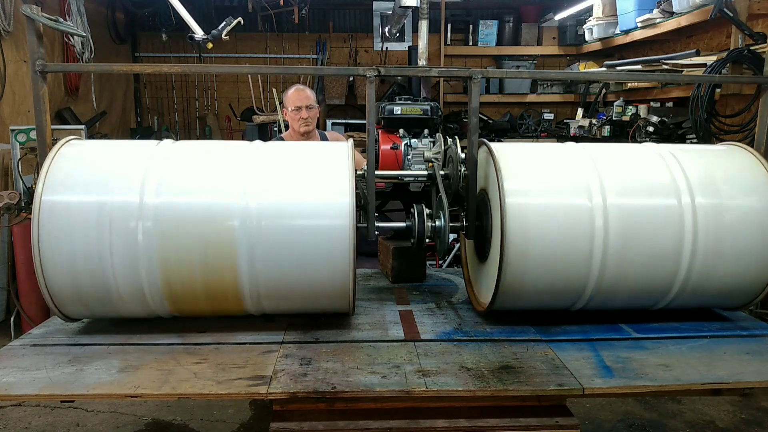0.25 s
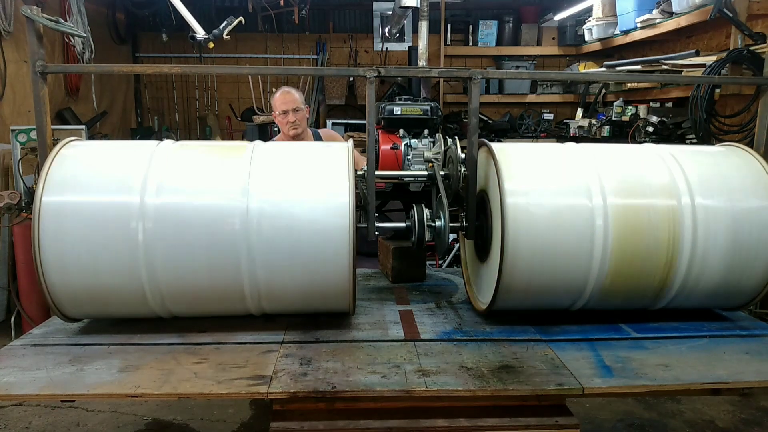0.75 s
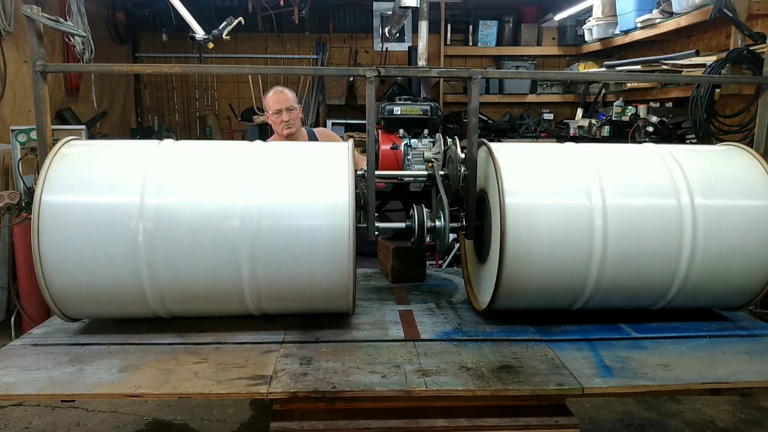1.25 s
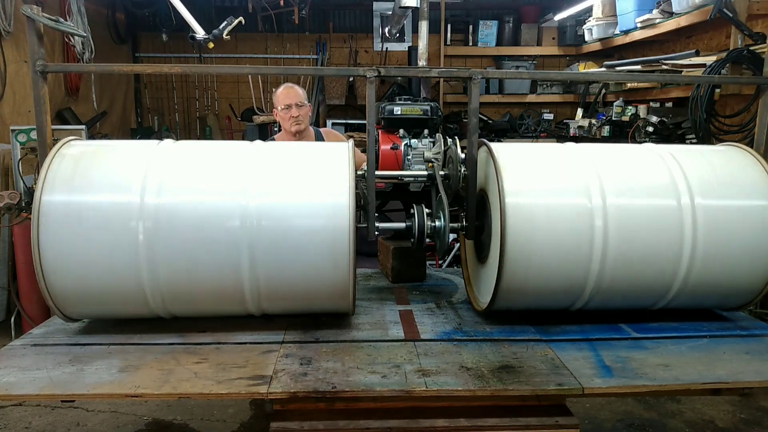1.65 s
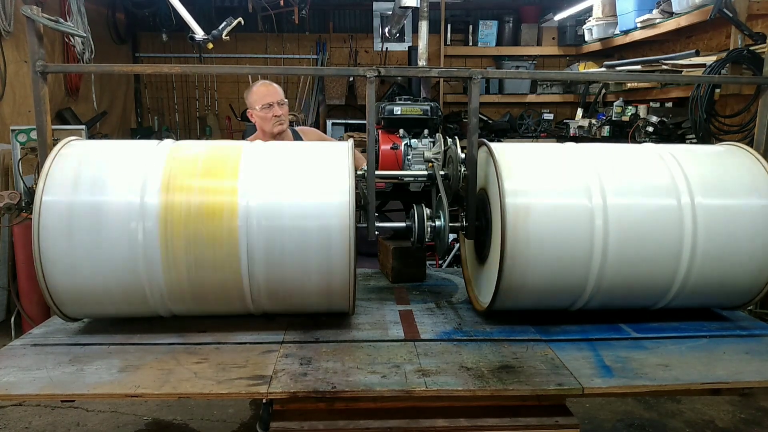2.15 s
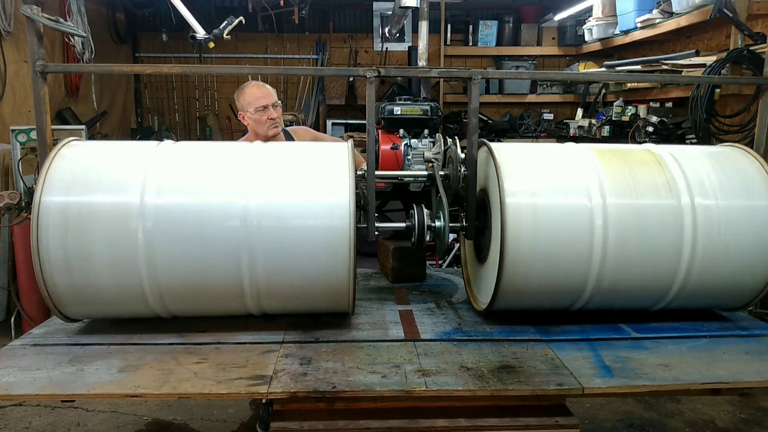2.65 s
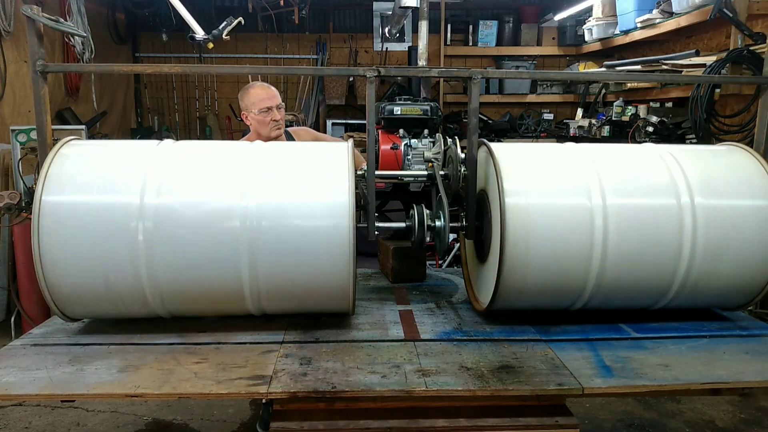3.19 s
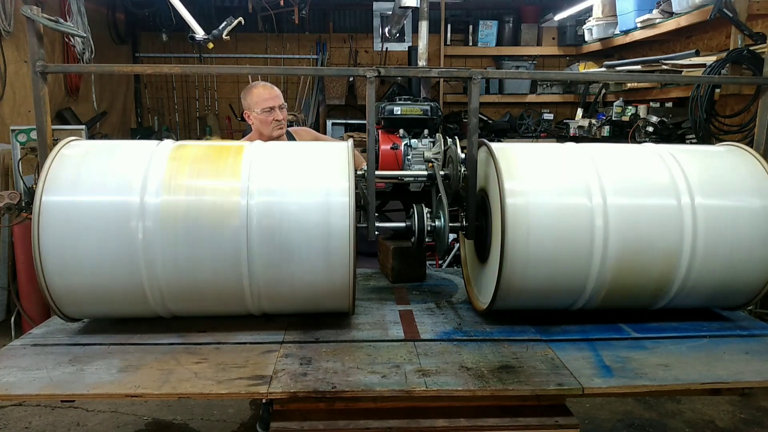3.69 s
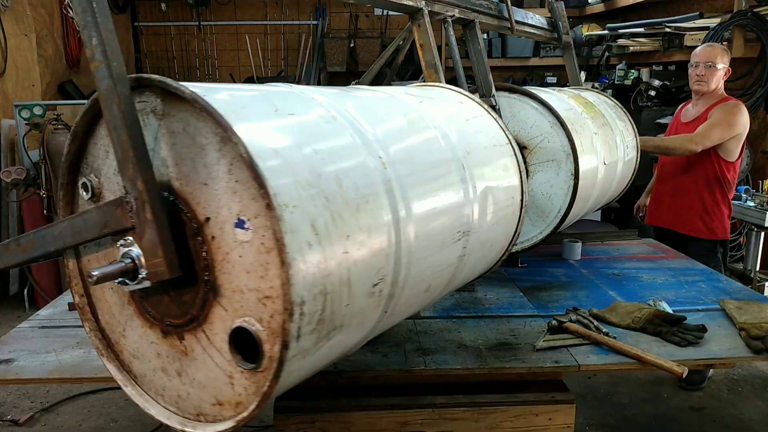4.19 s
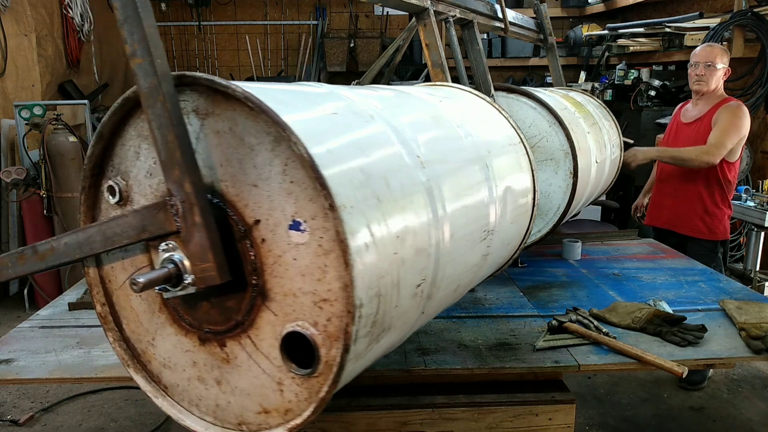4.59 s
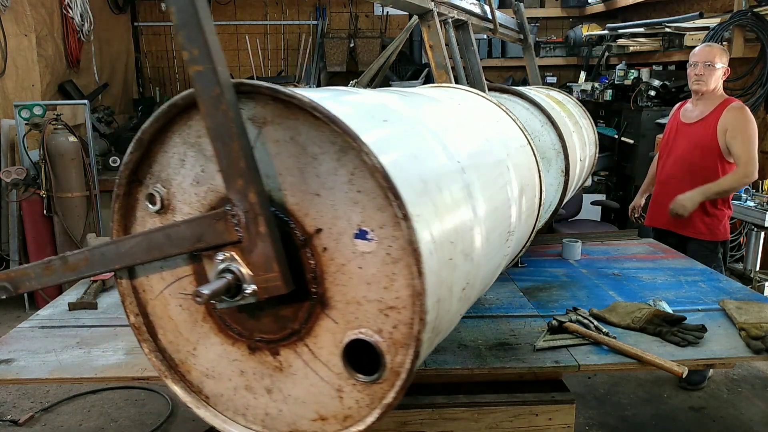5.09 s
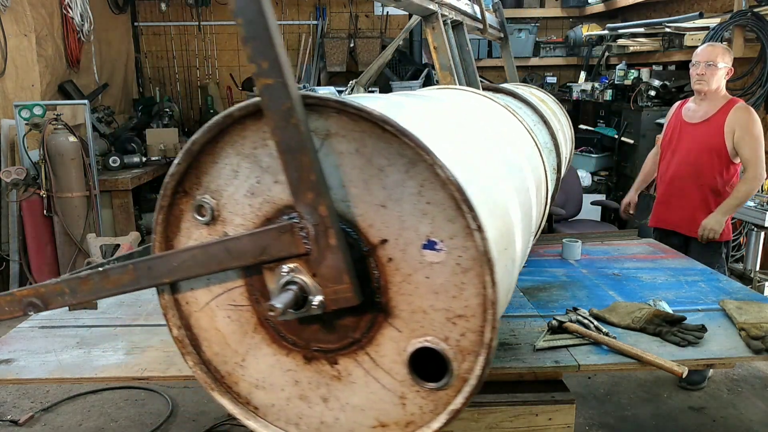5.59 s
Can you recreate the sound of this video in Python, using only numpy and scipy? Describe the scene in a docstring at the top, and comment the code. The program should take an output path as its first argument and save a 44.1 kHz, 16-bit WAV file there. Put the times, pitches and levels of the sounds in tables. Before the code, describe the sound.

A dense mechanical roar starts at once: rapid engine firing, uneven gearing pulsing about five times a second, hollow steel drums ringing under constant small contacts, and harsh rushing air. Short rasps pass early and near the end of the run. A sudden edit replaces everything with a far quieter indoor shop, its faint hum and hollow air broken by soft dull movements and a low soft bump. Single-channel, overloaded microphone sound.

```python
"""Petrol engine turning steel drums

A small single-cylinder petrol engine on a workbench turns two empty steel drums: a harmonic series of the
firing rate drones through the shop, and gearing throbs and growls in a pattern repeated five times a second.
Shaped noise gives the rush, random contacts ring steel modes, and two bursts of tiny slips scrape.
After a hard cut the quiet shop fades in: coloured noise, soft shuffles, a faint hum, a rumble and a low bump."""
import sys
import numpy as np
from scipy import signal
from scipy.fft import rfft, irfft, next_fast_len
from scipy.io import wavfile

SR = 44100
rng = np.random.default_rng(int(sys.argv[2]) if len(sys.argv) > 2 else 0)


def unload_wav(signal):
    """Save mono or channel-first audio to the path in sys.argv[1] as 16-bit WAV at rate SR, clipped to [-1, 1]."""
    wavfile.write(
        sys.argv[1],
        SR,
        np.round(np.clip(np.atleast_2d(signal).T, -1, 1) * 32767).astype(np.int16),
    )


N = 257544
TIME = np.arange(N) / SR
CUT_S, RESUME_S = 4.1727, 4.185  # the machine is cut off; the quiet shop begins

# Fundamental of the firing, before the drone's overall level: multiple of the firing rate, level/dB rms
FIRING_TONE = (1, -45.5)
# Its harmonics, before the drone's overall level: multiple of the firing rate, level/dB rms
FIRING_HARMONICS = [(2, -35), (3, -38), (4, -41), (5, -32.6), (6, -43), (7, -37), (8, -31), (9, -35),
                    (10, -31), (11, -39), (12, -42), (13, -41), (14, -26.2), (15, -41), (16, -33.5),
                    (20, -44), (21, -41), (24, -45), (25, -45.5), (26, -41.5), (28, -37), (31, -43.5),
                    (32, -38), (34, -40.5), (36, -44)]
# Swings in level of three of the harmonics, by multiple of the firing rate: t/s, added level/dB
HARMONIC_SWINGS = {14: [(0.1, -0.5), (0.36, 5.5), (0.55, -1), (0.78, 3), (1.05, -1), (1.35, 5.5),
                   (1.57, -4), (1.77, 4), (2.15, 2), (2.9, 0), (3.4, 3), (3.75, -1), (4.0, 3)],
                   8: [(0.1, -0.5), (1.0, 4), (1.55, 2), (1.85, -12.5), (2.05, 3.5), (2.5, 4.5),
                   (2.7, -7.5), (2.92, 3), (3.85, -1.5), (4.1, 0.5)], 32: [(0.15, -10.5), (0.45, -3.5),
                   (0.62, -3.5), (1.4, -2), (1.72, 10.5), (2.3, 3), (2.77, 9), (3.05, -6), (3.27, 6.5),
                   (3.8, -3.5)]}


def drone(cycle, waver_db, waver_turns, waver_rate, flutter_db, flutter_rate, level_db):
    """Fourier series of the firing; turning drums sway it and uneven burns flutter it, high orders most."""
    out = np.zeros(N)
    for order, db in [FIRING_TONE] + FIRING_HARMONICS:
        unrest = np.sqrt(order / 10)
        if order in HARMONIC_SWINGS:
            swing_db = in_time(HARMONIC_SWINGS[order])[0]
        else:
            swing_db = unrest * waver_db * drift(waver_rate)
        flutter = rms_one(from_db(unrest * flutter_db * drift(flutter_rate)))
        phase_waver = unrest * waver_turns * drift(waver_rate)
        turns = order * cycle + rng.random() + phase_waver
        out += from_db(db + swing_db) * flutter * np.cos(2 * np.pi * turns)
    return np.sqrt(2) * from_db(level_db) * out


# The governed engine settles very slightly under its load: t/s, firing rate f/Hz
FIRING_RATE = [(1.1, 33.51), (1.6, 33.43)]
# Strongest gear tones, sounded by the drums, before gain and throb: multiple of the shaft rate, level/dB rms
GEAR_TONES = [(15, -46.5), (25, -43), (27, -40.5), (30, -40.5), (36, -34), (37, -36.5), (40, -35.5),
              (43, -38.5), (47, -42.5), (49, -41), (51, -37.5), (53, -34.5), (61, -34.5), (62, -41.5),
              (63, -33.5), (64, -37), (66, -34.5), (67, -34), (81, -39), (82, -39.5), (83, -39.5),
              (85, -38.5), (88, -39.5), (89, -40), (90, -37.5), (92, -40.5), (102, -38), (106, -38.5),
              (107, -37.5), (111, -35.5), (116, -39.5), (132, -42.5), (177, -44.5), (197, -42),
              (210, -42.5), (230, -43.5)]
# Typical level of the many weaker gear tones, before gain and throb: f/Hz, level/dB rms of each
GEAR_GROWL = [(35, -73), (55, -59), (90, -52), (150, -50.5), (220, -44.5), (350, -47), (550, -47.5),
              (680, -55), (1000, -56), (1500, -66.5)]
GEAR_RATIO = 13  # turns of the crank for one turn of the shaft
GEAR_GAIN_DB = 2.2
THROB_DB, THROB_TOP_S = 2.5, .043  # depth either way; time of the first top


def gearing(cycle, slack_turns, slack_rate):
    """Periodicity: uneven teeth growl alike each shaft turn; slack shifts the phase, load throbs twice a turn."""
    size = 8192  # points in one turn
    orders = np.arange(size // 2 + 1)
    hz = np.maximum(orders, 1) * 2 * FIRING_RATE[-1][1] / GEAR_RATIO  # the crank turns twice a firing
    points = np.array(GEAR_GROWL)
    growl_db = np.interp(np.log(hz), np.log(points[:, 0]), points[:, 1], left=-np.inf, right=-np.inf)
    db = growl_db + rng.normal(0, 0.92, len(hz))
    for order, level_db in GEAR_TONES:
        db[order] = level_db

    apart_from_crank = orders % GEAR_RATIO > 0
    phases = np.exp(2j * np.pi * rng.random(len(hz)))
    one_turn = irfft(from_db(db) * apart_from_crank * phases) * size / np.sqrt(2)

    turns = 2 * cycle / GEAR_RATIO + slack_turns * drift(slack_rate)
    top_turn = np.interp(THROB_TOP_S, TIME, turns)
    throb_db = THROB_DB * np.cos(4 * np.pi * (turns - top_turn))
    growl = np.interp(turns, np.arange(size) / size, one_turn, period=1)
    return from_db(GEAR_GAIN_DB + throb_db) * growl


def exhaust(cycle, puff_share, uneven_db, steady):
    """Turbulence noise: one gas puff a cycle, each of its own strength, over the steady cooling air."""
    cycle_strengths = from_db(uneven_db * rng.standard_normal(256))
    strength = cycle_strengths[cycle.astype(int)]
    puff = strength * np.exp(-(cycle % 1) / puff_share)
    return rms_one((steady + puff) * rng.standard_normal(N))


def clatter(cycle, per_s, spread_db, bunching):
    """Random impulse process: contacts in the drive, bunched by each crank turn (two a firing cycle)."""
    chance = per_s / SR * (1 + bunching * np.cos(4 * np.pi * cycle))
    signs = rng.choice([-1, 1], N)
    sizes = from_db(spread_db * np.minimum(rng.exponential(1, N), 4)) * signs
    return rms_one(sizes * (rng.random(N) < chance))


# Spectrum of exhaust, cooling air and drive, relative density: f/Hz, level/dB per Hz
RUSH_SPECTRUM = [(25, -45), (45, -25.5), (80, -20.5), (140, -8), (300, -0.5), (560, -3), (740, -3),
                 (1150, -1.5), (1400, -3), (2000, -2.5), (2600, -4.5), (2950, -8.5), (3350, -8),
                 (3900, -11.5)]
# Bright hiss of the drive, continuing the same spectrum: f/Hz, level/dB per Hz
HISS_SPECTRUM = [(4400, -12), (5200, -15.5), (5700, -17), (6700, -20), (7400, -20.5), (8000, -19)]
RUSH_DB = -13.5


def rush(cycle, knocks):
    """Spectral shaping: reverberant exhaust noise and contacts take one broad colour."""
    gas = exhaust(cycle, puff_share=0.15, uneven_db=-2.0, steady=3.1)
    shaking = shop(gas + from_db(-1.5) * knocks, t60=0.4, wet_db=3.5)
    return from_db(RUSH_DB) * coloured(shaking, RUSH_SPECTRUM + HISS_SPECTRUM)


# Normal modes of the drums and frame: f/Hz, width/Hz, level/dB rms
DRUM_RESONANCES = [(126, 9, -45), (190, 14, -45), (219, 22, -35), (274, 32, -33), (349, 28, -35),
                   (431, 21, -38.5), (469.5, 15, -32), (527, 12, -39.5), (560, 26, -25.5), (602, 20, -36.5),
                   (681, 9.6, -38), (915, 20, -30.5), (930, 12, -35), (1078, 16, -33), (1090, 28, -32.5),
                   (1125, 20, -39.5), (1215, 36, -34)]
# Normal modes of small steel parts of the drive: f/Hz, width/Hz, level/dB rms
DRIVE_RESONANCES = [(2060, 160, -38), (2870, 35, -45), (3188, 60, -31.5), (3480, 89, -50), (3770, 22, -51),
                    (4367, 120, -41), (5470, 67, -46.5), (5700, 74, -47.5), (6180, 50, -50.5),
                    (6960, 70, -47), (7240, 70, -43)]


def ringing(knocks):
    """Modal excitation: the parts turn, so every contact meets each mode with a different strength."""
    out = np.zeros(N)
    for hz, width_hz, db in DRUM_RESONANCES + DRIVE_RESONANCES:
        struck = knocks * rng.uniform(-0.71, 1, N)
        out += from_db(db) * rms_one(resonance(struck, hz, width_hz))
    return out


# Brief scrapes of the drive against steel: t/s at the top, level/dB rms
SCRAPE_EVENTS = [(0.679, -25.5), (3.6, -20.5)]
# Rasp of a scrape, relative density: f/Hz, level/dB per Hz
SCRAPE_SPECTRUM = [(1800, -27), (2600, 1.5), (3200, 1.5), (3700, -7.5), (4500, -17.5), (7500, -14)]
SCRAPE_ATTACK_S, SCRAPE_RELEASE_S = .024, .026


def scrapes(cycle):
    """Stick-slip friction: short runs of tiny slips make the steel of the drive rasp."""
    level = sum(from_db(db) * swell(s, SCRAPE_ATTACK_S, SCRAPE_RELEASE_S) for s, db in SCRAPE_EVENTS)
    slips = clatter(cycle, per_s=3000, spread_db=5.0, bunching=0.19)
    return level * coloured(slips, SCRAPE_SPECTRUM)


def machine():
    """Superposition of drone, gearing, rush, ringing and scrapes, all driven by one crank."""
    firing_hz, = in_time(FIRING_RATE)
    cycle = np.cumsum(firing_hz) / SR
    knocks = clatter(cycle, per_s=1300, spread_db=3.0, bunching=.15)
    engine = drone(cycle, waver_db=1.3, waver_turns=0.018, waver_rate=3.4,
                   flutter_db=1.1, flutter_rate=4.5, level_db=2.6)
    gears = gearing(cycle, slack_turns=0.00032, slack_rate=4)
    return engine + gears + rush(cycle, knocks) + ringing(knocks) + scrapes(cycle)


# Soft shuffles in the quiet shop: t/s at the top, level/dB rms, release t/s
SHUFFLES = [(4.575, -57, .03), (4.63, -58, .04), (4.77, -58.5, 0.054), (4.87, -58, .03),
            (5.01, -56.5, 0.065), (5.5, -63, .025), (5.81, -59, .05)]
# Dull colour of a shuffle, relative density: f/Hz, level/dB per Hz
SHUFFLE_SPECTRUM = [(150, -14), (330, 4), (550, 2), (900, -7), (1900, -7), (2800, -18), (5000, -34)]
SHUFFLE_ATTACK_S = 0.025


def shuffles():
    """Amplitude modulation: soft swells of dull noise."""
    level = sum(from_db(db) * swell(s, SHUFFLE_ATTACK_S, release_s) for s, db, release_s in SHUFFLES)
    return level * coloured(rng.standard_normal(N), SHUFFLE_SPECTRUM)


BUMP_S, BUMP_HZ, BUMP_LENGTH_S, BUMP_DB = 4.743, 44, .012, -46


def bump():
    """Wave packet: a low sine under a Gaussian envelope makes one soft bump."""
    since = TIME - BUMP_S
    envelope = np.exp(-(since / BUMP_LENGTH_S) ** 2)
    return from_db(BUMP_DB) * envelope * np.sin(2 * np.pi * BUMP_HZ * since)


RUMBLE_DB, RUMBLE_RISE_DB = -80, 19
RUMBLE_TOP_S, RUMBLE_ATTACK_S, RUMBLE_RELEASE_S = 4.62, .13, .33


def rumble():
    """Modulated low-frequency noise: it rises and falls once around the bump."""
    level_db = RUMBLE_DB + RUMBLE_RISE_DB * swell(RUMBLE_TOP_S, RUMBLE_ATTACK_S, RUMBLE_RELEASE_S)
    spectrum = [(18, -10), (30, -2), (55, 5), (110, -26), (400, -66)]  # f/Hz, level/dB per Hz
    return from_db(level_db) * coloured(rng.standard_normal(N), spectrum)


# Hum of a distant fan, before its slight waver: f/Hz, level/dB rms
FAN_TONES = [(75.5, -65.7), (152.5, -67.3), (230, -77), (382, -73)]


def fan_hum():
    """Additive synthesis: steady tones whose strength and phase waver slightly."""
    out = np.zeros(N)
    for hz, db in FAN_TONES:
        strength = 1 + .15 * drift(2)
        phase = 2 * np.pi * hz * TIME + .15 * drift(2)
        out += from_db(db) * np.sqrt(2) * strength * np.sin(phase)
    return out


# Spectrum of the quiet shop, relative density: f/Hz, level/dB per Hz
ROOM_SPECTRUM = [(20, -15), (45, -2), (75, -3), (100, 3), (180, 0), (235, 3), (270, -3.5), (330, 4),
                 (400, 6), (470, -4), (720, -1.5), (1100, 0.5), (1900, -3.5), (2700, -11), (3700, -14),
                 (5000, -24), (7700, -31)]
# Broad hollow resonances of the quiet shop: f/Hz, width/Hz, level/dB relative to the room tone
ROOM_RESONANCES = [(319, 18, -5.5), (420, 68, -11), (554, 47, -8), (960, 45, -11)]
ROOM_DB = -57.5


def room_air():
    """Room resonance: broad noise with a few hollow modes."""
    air = coloured(rng.standard_normal(N), ROOM_SPECTRUM)
    for hz, width_hz, db in ROOM_RESONANCES:
        air = air + from_db(db) * rms_one(resonance(rng.standard_normal(N), hz, width_hz))
    return from_db(ROOM_DB) * rms_one(air)


def quiet_shop():
    """Superposition of independent faint sources."""
    return shuffles() + bump() + rumble() + fan_hum() + room_air()


def shop(x, t60, wet_db, count=6):
    """Reverberation: direct sound and dense reflections, whose paths keep changing as the drums turn."""
    age, wet = TIME[:SR // 3], 0
    for _ in range(count):
        decay = from_db(-60 * age / t60)
        tail = rng.standard_normal(len(age)) * decay * (age > .003)
        changing = x * np.cos(2 * np.pi * drift(40))
        wet = wet + irfft(rfft(changing, N) * rfft(tail, N), N)
    return rms_one(rms_one(x) + from_db(wet_db) * rms_one(wet))


def resonance(x, hz, width_hz):
    """Damped oscillator: a two-pole band-pass, already ringing at the start."""
    r = np.exp(-np.pi * width_hz / SR)
    poles = [1, -2 * r * np.cos(2 * np.pi * hz / SR), r * r]
    return signal.lfilter([1, 0, -1], poles, np.r_[x[-SR // 4:], x])[-N:]


def coloured(x, spectrum):
    """Spectral filtering: shape a steady sound by a density curve, at unit power."""
    size = next_fast_len(N)
    hz = np.maximum(np.arange(size // 2 + 1) * SR / size, 1)
    points = np.array(spectrum)
    db = np.interp(np.log(hz), np.log(points[:, 0]), points[:, 1])
    heard = (hz > 15) & (hz < 9000)
    return rms_one(irfft(rfft(x, size) * from_db(db) * heard, size)[:N])


def drift(rate):
    """Low-passed noise: slow chance with a spread of one and two poles at the given rate in Hz."""
    r = np.exp(-80 * np.pi * rate / SR)  # worked out at every 40th sample
    slow = signal.lfilter([1], [1, -2 * r, r * r], rng.standard_normal(N // 40 + 2002))[2000:]
    return np.interp(np.arange(N) / 40, np.arange(len(slow)), rms_one(slow))


def swell(top_s, attack_s, release_s):
    """Gaussian envelope: a smooth rise from nought to one and back."""
    since = TIME - top_s
    return np.exp(-(since / np.where(since < 0, attack_s, release_s)) ** 2)


def in_time(rows):
    """Linear interpolation: each column of a curve, at every sample."""
    s, *columns = np.transpose(rows)
    return [np.interp(TIME, s, c) for c in columns]


def from_db(db):
    """Logarithmic level: decibels to amplitude gain."""
    return 10 ** (np.asarray(db) / 20)


def rms_one(x):
    """Power normalisation: scale to a mean square of one."""
    return x / np.sqrt(np.mean(x ** 2) + 1e-20)


def scene():
    """Succession in time: first the running machine, then the quiet shop."""
    return np.where(TIME < RESUME_S, machine(), quiet_shop())[None]


# GAIN_SHARE is the part of the excess in dB that is taken away
GAIN_THRESHOLD_DB, GAIN_FOLLOW_S, GAIN_SHARE = -13.2, .035, .7


def gain_control(x):
    """Dynamic compression: follow the mean power and turn down whatever rises over the threshold."""
    r = np.exp(-1 / (GAIN_FOLLOW_S * SR))
    threshold = from_db(GAIN_THRESHOLD_DB) ** 2
    start = np.mean(x[:, :SR // 2] ** 2, axis=1, keepdims=True)
    power, _ = signal.lfilter([1 - r], [1, -r], x ** 2, zi=start)
    return x * np.maximum(power / threshold, 1) ** (-GAIN_SHARE / 2)


MIC_TOP_HZ, CUTOFF_HZ = 7600, 15700
CUT_DECAY_S, CUT_TAIL_DB = 0.0035, -25.5  # the cut drops to this level, then decays
FADE_IN_S = 0.019


def record(dry):
    """Transduction: compression, soft saturation and a dull microphone, then a hard cut and a fade-in."""
    held = gain_control(dry)
    rounded = held / (1 + (held / .86) ** 6) ** (1 / 6)
    mic = signal.ellip(8, .2, 70, MIC_TOP_HZ, fs=SR, output="sos")
    dull = signal.sosfilt(mic, rounded)

    tail = from_db(CUT_TAIL_DB) * np.exp(-np.maximum(TIME - CUT_S, 0) / CUT_DECAY_S)
    fade_in = np.clip((TIME - RESUME_S) / FADE_IN_S, 0, 1)
    edit = np.where(TIME < CUT_S, 1, tail) + fade_in
    low_pass = signal.ellip(10, .2, 80, CUTOFF_HZ, fs=SR, output="sos")
    return signal.sosfilt(low_pass, dull * edit)


dry = scene()
out = record(dry)
unload_wav(out)
```